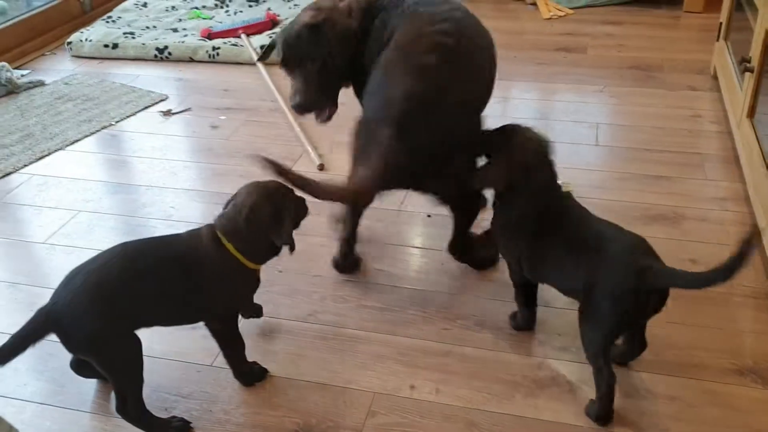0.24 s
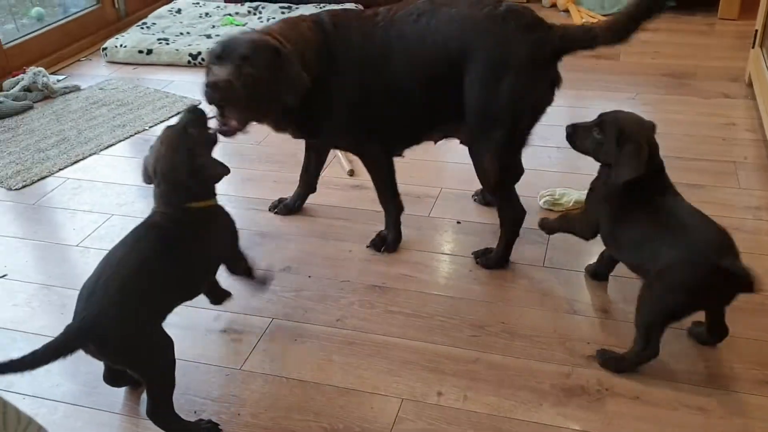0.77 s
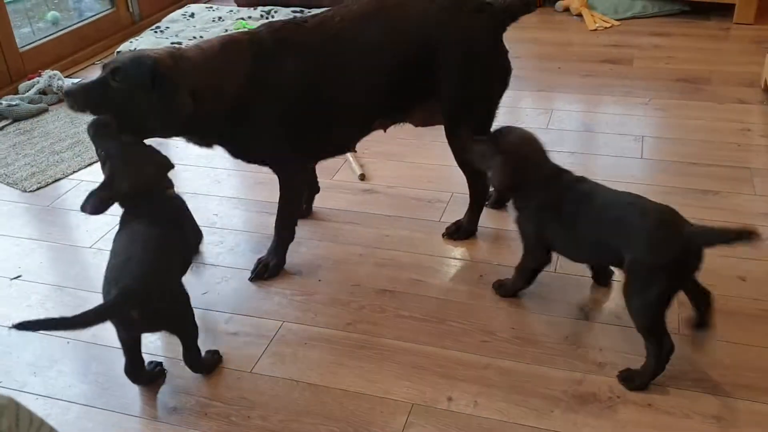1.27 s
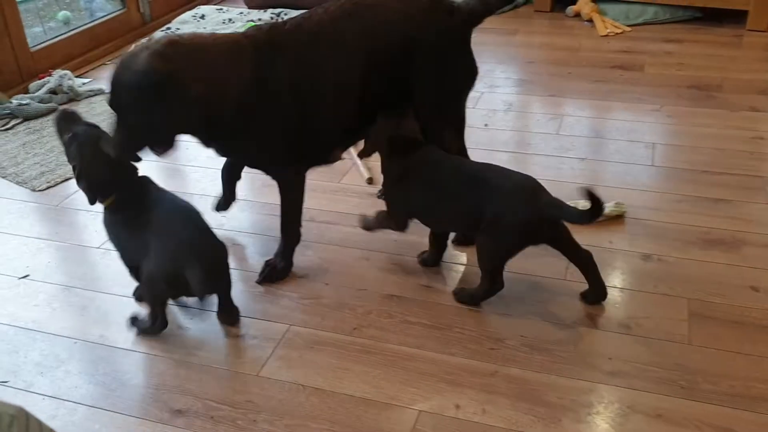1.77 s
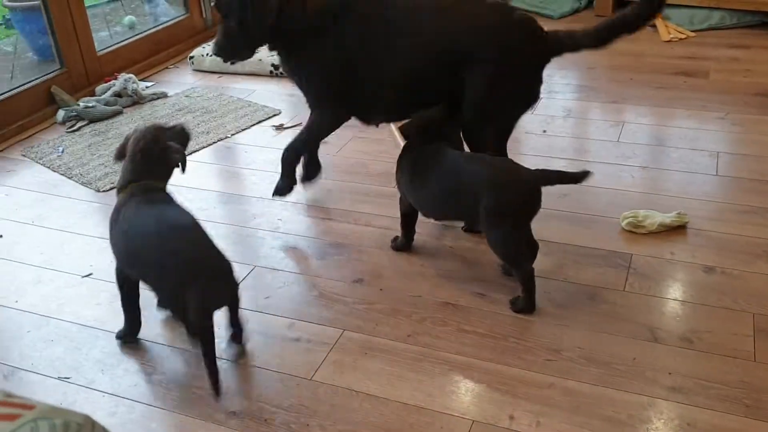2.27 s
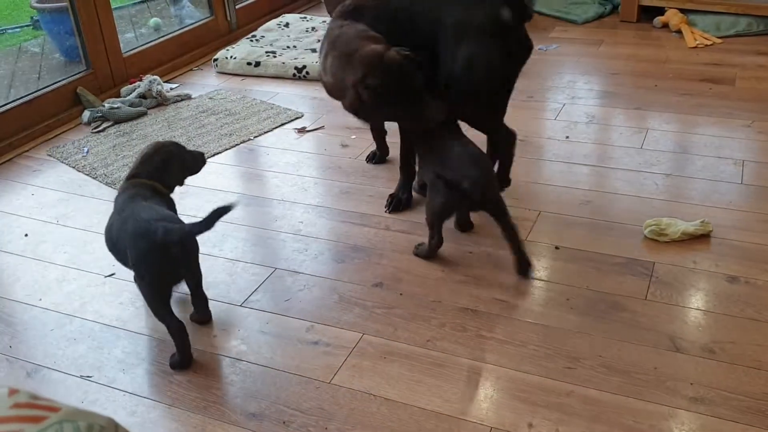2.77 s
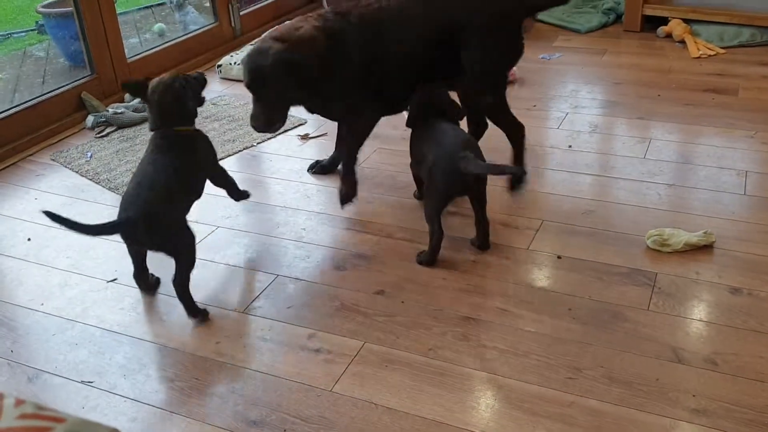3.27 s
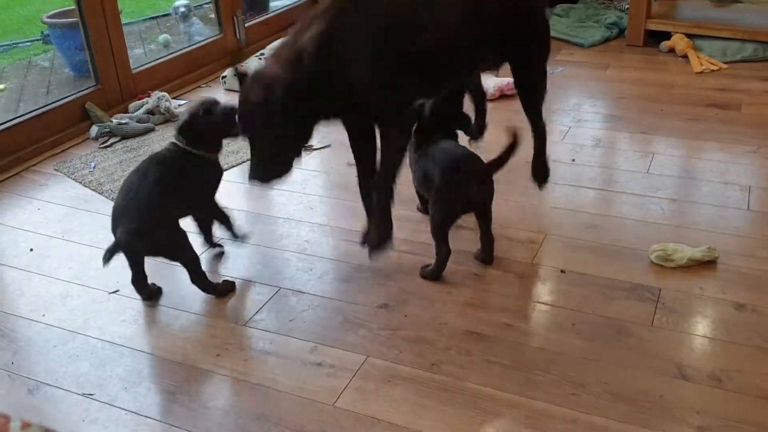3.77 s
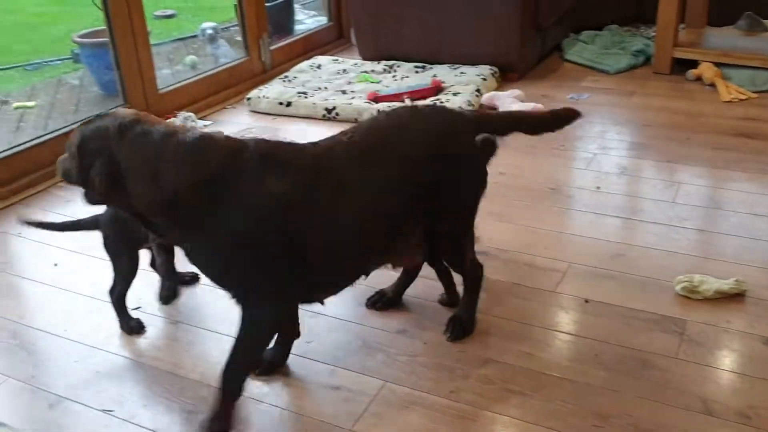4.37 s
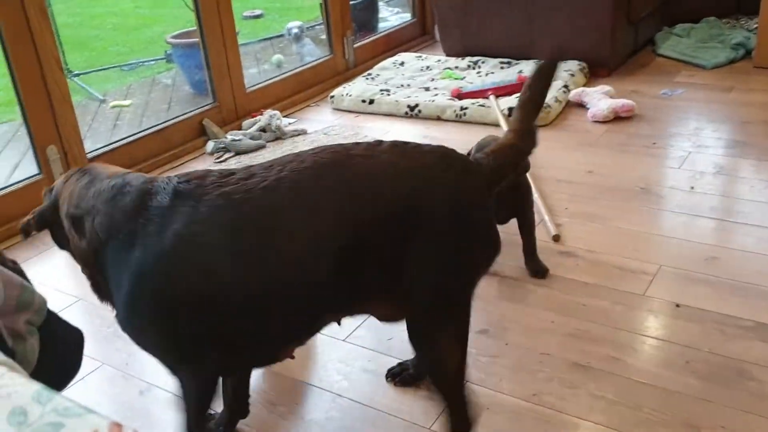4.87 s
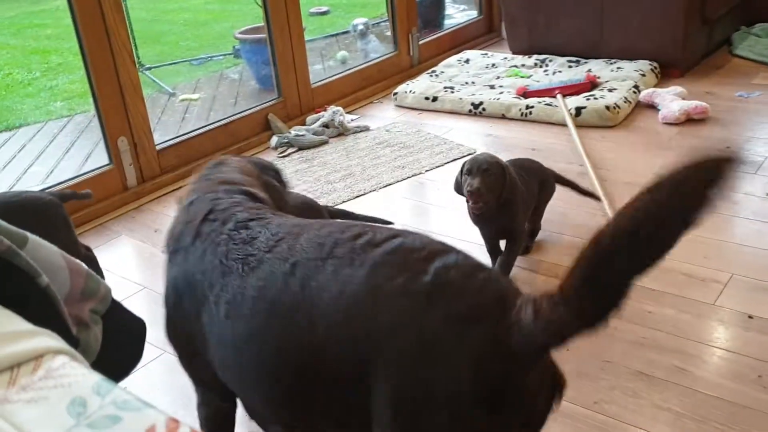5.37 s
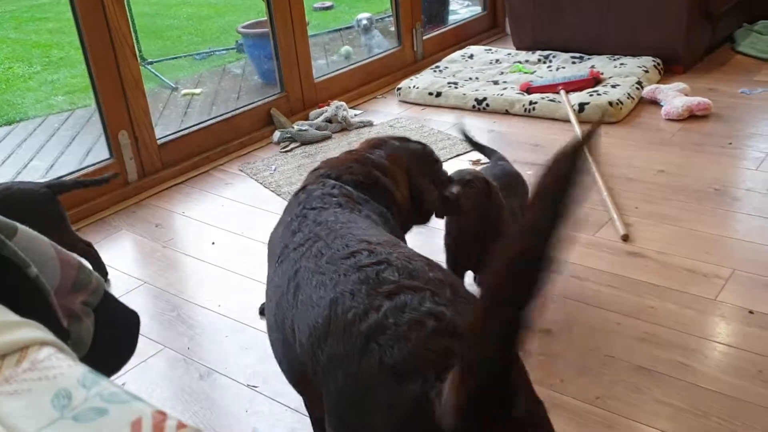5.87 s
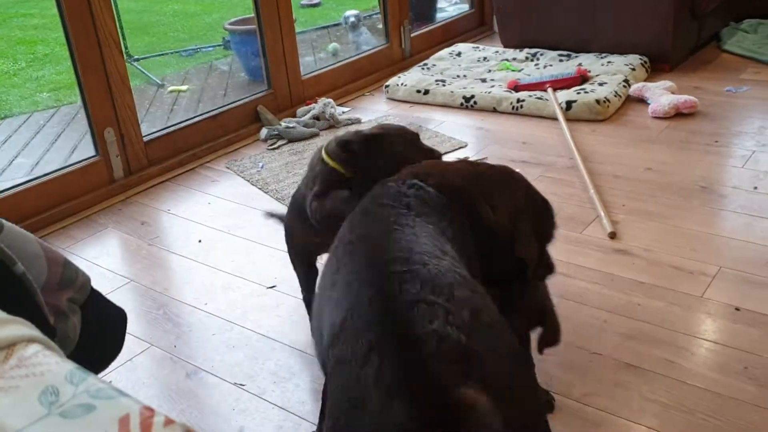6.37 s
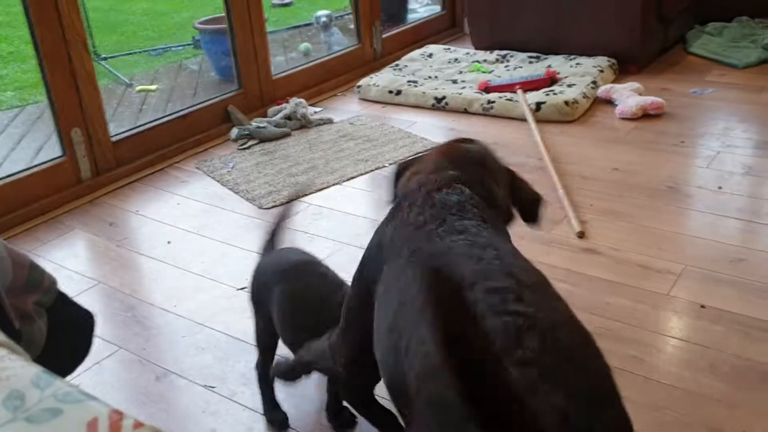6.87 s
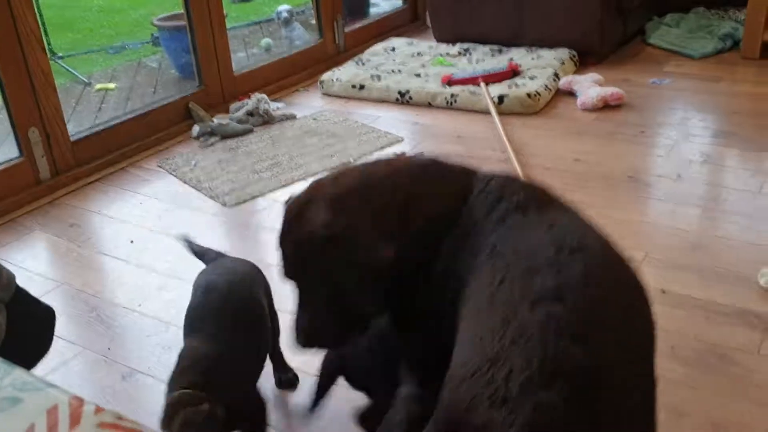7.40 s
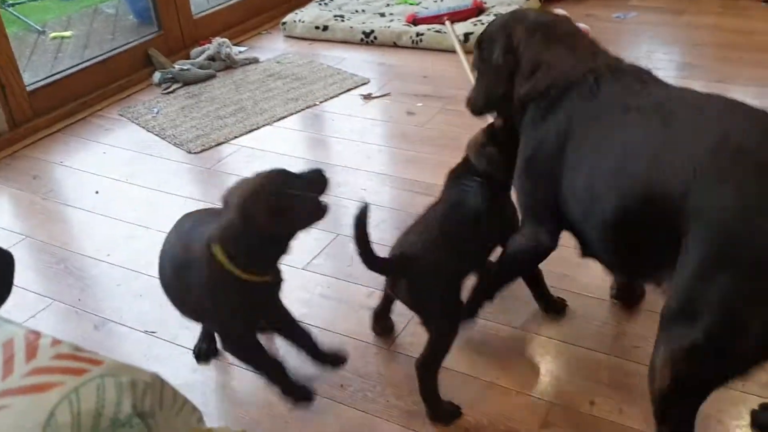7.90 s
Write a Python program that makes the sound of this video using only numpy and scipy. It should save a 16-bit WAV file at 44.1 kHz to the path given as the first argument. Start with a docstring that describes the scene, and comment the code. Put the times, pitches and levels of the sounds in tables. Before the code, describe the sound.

Dog claws click, tick and skid rapidly across an echoing wooden floor, with soft paw thuds, a low appliance hum and late close bumps.

```python
"""An echoing room with a wooden floor: a big dog and two puppies romp close to a hand-held phone.
Claws click as struck resonances and skid as trains of tiny catches; pads thud and scuff as shaped noise.
Late on the big dog bumps and brushes past close by: decaying low tones, rumble and coat noise.
Underneath, an appliance hums as one steady-pitched tone over a bed of soft coloured air."""
import sys
import numpy as np
from scipy import signal
from scipy.fft import rfft, irfft, next_fast_len
from scipy.io import wavfile

SR = 44100
rng = np.random.default_rng(int(sys.argv[2]) if len(sys.argv) > 2 else 0)


def put_to_file(sound):
    """Save the sound as 16-bit audio at rate SR, in the file named by the first command-line argument."""
    columns = np.atleast_2d(sound).T  # one column per channel
    safe = np.clip(columns, -1, 1)
    whole_steps = np.round(safe * 32767)
    wavfile.write(sys.argv[1], SR, whole_steps.astype(np.int16))


N = 358972
T = np.arange(N) / SR  # s


def undb(db):
    """Decibels to gain."""
    return 10 ** (np.asarray(db) / 20)


def unit(x):
    """Scale to an energy of one."""
    return x / np.sqrt(np.sum(x ** 2))


def level(x, db):
    """Scale to an rms level."""
    return x * undb(db) / np.sqrt(np.mean(x ** 2))


def curve(points):
    """Read (t/s, level/dB) points as an automation lane over the whole scene."""
    return np.interp(T, *np.transpose(points))


def along(points, hz):
    """Read (f/Hz, value) points on a logarithmic frequency axis."""
    f, value = np.transpose(points)
    return np.interp(np.log(np.maximum(hz, 1)), np.log(f), value)


def colour(x, points):
    """Minimum-phase EQ with the given (f/Hz, level/dB) spectrum, so that attacks stay sharp."""
    size = 2 * next_fast_len(x.shape[-1], real=True)
    hz = np.fft.rfftfreq(size, 1 / SR)
    cepstrum = irfft(np.log(undb(along(points, hz))))
    # folding the cepstrum onto positive time makes the filter causal
    cepstrum[1:size // 2] *= 2
    cepstrum[size // 2 + 1:] = 0
    response = np.exp(rfft(cepstrum))
    return irfft(rfft(x, size) * response)[..., :x.shape[-1]]


def resonate(x, hz, q):
    """One resonance with a gain of one at its centre."""
    b, a = signal.iirpeak(min(hz, SR / 3), max(q, 1), fs=SR)
    return signal.lfilter(b, a, x)


def add(track, s, sound):
    """Mix a sound into a track at a given time."""
    start = max(int(s * SR), 0)
    part = track[..., start:start + sound.shape[-1]]
    part += sound[..., :part.shape[-1]]


def stereo_noise(size, wide_hz=1250):
    """Diffuse noise at two close microphones: alike in the bass, unrelated in the treble."""
    mid, side = rng.standard_normal((2, size))
    side = signal.lfilter(*signal.butter(1, wide_hz, "high", fs=SR), side)
    return np.array([mid + side, mid - side])


def shiver(x, count=5, width_hz=1300):
    """A board carries each frequency at its own speed: all-passes smear a blow but keep its spectrum."""
    pole = np.exp(-np.pi * width_hz / SR)
    for hz in rng.uniform(2500, 12000, count):
        a = np.array([1, -2 * pole * np.cos(2 * np.pi * hz / SR), pole ** 2])
        x = signal.lfilter(a[::-1], a, x)
    return x


# reverb tone: f/Hz, level/dB
REVERB_COLOUR = [(200, 0.5), (700, 5), (1500, 6.5), (3300, 6.5), (5000, -1.5), (8000, -2.5), (16000, 7)]
# reverberation time in each band: f/Hz, T60/s
REVERB_T60 = [(150, 0.79), (400, 0.27), (1000, 0.59), (2800, 0.57), (7000, 0.52), (14000, 0.34)]


def room(x, build_s=0.0006, merge_s=0.02, left_db=1.22):
    """Hard floor and glass doors: single echoes merge into a dense tail with its own decay in each band."""
    t = T[:SR * 3 // 4]
    density = np.clip((t / merge_s / 2) ** 2, 0.04, 1)
    echo_here = rng.random(len(t)) < density
    spectrum = rfft(stereo_noise(len(t)) * echo_here / np.sqrt(density))
    hz = np.fft.rfftfreq(len(t), 1 / SR)
    centres, t60s = np.transpose(REVERB_T60)
    tail = 0
    for weights, t60 in zip(np.eye(len(centres)), t60s):
        # overlapping bands, each falling 60 dB in its T60
        band = irfft(spectrum * along(np.c_[centres, weights], hz), len(t))
        tail = tail + band * np.exp(-np.log(1000) * t / t60)
    tail = colour(tail * (1 - np.exp(-t / build_s)), REVERB_COLOUR)
    sides = zip(tail, (left_db, -left_db))
    return np.array([signal.fftconvolve(x, unit(ear))[:N] * undb(db) for ear, db in sides])


# appliance hum over time: t/s, level/dB
HUM_LEVEL = [(0, -50), (0.6, -47), (6.05, -46.5), (6.35, -53), (8.14, -53)]
# still air of the house: f/Hz, level/dB
AIR_COLOUR = [(25, -9.5), (45, -8), (61, 6), (80, -5.5), (160, -5), (300, -14.5), (400, -18), (700, -13.5),
              (1500, -24.5), (8000, -25), (16000, -35)]


def background(hum_hz=100.1, air_db=-51.5):
    """An appliance hums at twice the mains rate over the still air of the house."""
    hum = level(np.sin(2 * np.pi * hum_hz * T), 0) * undb(curve(HUM_LEVEL))
    return hum + level(colour(stereo_noise(N), AIR_COLOUR), air_db)


# tone of claw on board, for skids and clicks: f/Hz, level/dB
CLAW_TONE = [(150, -34), (400, -26.5), (600, -11.5), (1200, -14), (1900, -13), (3200, -6), (4400, 0.5),
             (6200, 0), (7900, 2), (8700, -4.5), (12500, -1.5), (16000, -16.5)]
# claws skidding: t/s at the peak, relative level/dB, length/s from the peak down to 1/e
CLAW_SKIDS = [(0.01, -36.5, 0.07), (0.618, -31.5, 0.011), (1.37, -49, 0.039), (1.89, -46, 0.028),
              (2.207, -41.5, 0.033), (2.687, -34, 0.027), (2.966, -38, 0.071), (4.579, -34.5, 0.018),
              (4.868, -42, 0.043), (5.6, -40.5, 0.064), (6.693, -39, 0.028), (7.412, -39, 0.078)]


def skids(catches_per_s=450, spread_db=4, direct_db=-4, room_db=-2, left_db=2):
    """A sliding claw catches and lets go hundreds of times a second."""
    pressure = sum(undb(db) * np.exp(-((T - s) / length) ** 2) for s, db, length in CLAW_SKIDS)
    caught = rng.random(N) < catches_per_s / SR
    catches = caught * undb(spread_db * np.clip(rng.standard_normal(N), -2, 2))
    scrape = level(colour(resonate(catches, 3580, 1), CLAW_TONE), 0) * pressure
    direct = np.array([shiver(scrape) * undb(db) for db in (left_db, -left_db)])
    return undb(direct_db) * direct + undb(room_db) * room(scrape)


# paws landing, shared by pads, claws and scuffs: t/s, energy level of the first claw/dB, ring f/Hz,
# room share/dB, time from claw to claw/s (0 = one claw only)
PAW_STEPS = [(0.0882, -12, 5630, 7.5, 0.00099), (0.2781, 6, 6100, 4.5, 0.016),
             (0.525, -10.5, 7080, 5, .019), (0.5644, -13, 6160, 9, 0.00012), (0.7087, -6, 5270, 7.5, 0),
             (0.8363, -12, 5920, 3.5, 0.00026), (0.926, -16, 4900, 7, 0),
             (1.0353, -19.5, 5750, 1, 0.000032), (1.1574, -3.5, 7240, 3.5, .0057),
             (1.548, -20, 5070, 4, 0.000038), (1.6196, -17.5, 5700, 5.5, 0.00072),
             (1.7046, -9.5, 5660, 2.5, 0), (1.9361, -2, 4800, 9.5, .0045), (1.983, -6, 5600, 0, 0.0004),
             (2.0721, -5, 5300, 8.5, 0.008), (2.3028, -12, 7050, 2, 0.00044), (2.3662, 0.5, 4800, 5, .0054),
             (2.3883, -4, 5670, 4, 0.00035), (2.4873, 8, 4900, 3.5, .0082),
             (2.8269, -7.5, 5040, 12, 0.0014), (3.0421, 6.5, 4570, 2.5, .0056),
             (3.3133, 0.5, 5160, 11.5, .003), (3.5523, -13.5, 5230, 3, 0.00079),
             (3.7344, -17.5, 6460, 16.5, 0), (3.802, -12, 7250, 1, 0), (3.8395, 0.5, 4800, 1.5, .0094),
             (3.8837, 7.5, 6840, 0.5, .012), (4.2243, 3, 7700, 1.5, .011),
             (4.2949, -2.5, 6800, 3.5, 0.00015), (4.3101, -2.5, 6840, 6, 0), (4.3603, -2.5, 7700, -5, 0),
             (4.4827, -12, 7400, 4, 0.00038), (4.6591, -11.5, 6900, 4, 0), (4.6762, 0, 7400, -0.5, .0044),
             (4.7659, -3.5, 7360, 8.5, 0), (4.9785, -4.5, 7650, 0.5, 0.000091), (5.0463, 4, 7200, 5, .0066),
             (5.3294, -8.5, 7300, 3, 0.00035), (5.399, -4.5, 7150, 9, .003), (5.432, -7, 7200, 4, 0),
             (5.668, -2.5, 7100, 3, .0068), (5.7553, -8.5, 7100, 10, 0.022), (6.1763, 2, 5360, 6, .004),
             (6.1915, -2.5, 7150, 1, 0.00016), (6.7425, -8, 7140, 3.5, 0), (6.7738, -6, 8300, -8, 0),
             (7.0505, 6, 7300, 3.5, .007), (7.0786, -.5, 6600, 2.5, 0.00065),
             (7.1914, -9.5, 6800, 7.5, 0.00077), (7.4342, -9.5, 6960, 9, 0.00051),
             (7.5529, 3.5, 7600, 7.5, .0128), (7.5828, 0.5, 7550, 3.5, 0.0022),
             (7.8106, 2.5, 7040, 5.5, 0.03), (8.086, -11.5, 4540, 2, 0)]
# thud of a pad on the floor: f/Hz, level/dB
PAD_TONE = [(25, -13), (60, 10.5), (110, 0.5), (170, 2), (300, -8), (600, -7), (1500, -27.5), (5000, -57)]
# heavy landings that thump the floor: t/s, energy level/dB
HEAVY_THUDS = [(1.15, -15), (2.31, -15.5), (2.78, -11), (3.068, -12.5), (3.869, -13.5), (3.987, -15),
               (4.21, -10), (4.289, -10), (4.966, -14.5), (5.648, -15), (5.769, -15.5), (6.047, -12.5)]


def pads(push_s=0.02, lead_s=0.013, step_db=-21, force_slope=0.64, room_db=-4):
    """Soft pads push the hollow floor: a short low thud, faint at each step, clear at a heavy landing."""
    out, t = np.zeros(N), T[:SR // 7]
    # a pad lands just before its claws; force_slope is thud dB per claw dB
    landings = [(s - lead_s, step_db + force_slope * db) for s, db, *_ in PAW_STEPS]
    for s, db in HEAVY_THUDS + landings:
        push = rng.standard_normal(len(t)) * t * np.exp(-t / push_s)
        add(out, s, unit(colour(push, PAD_TONE)) * undb(db))
    return out + undb(room_db) * room(out)


def click(ring_hz, ring_q=6, edge_ratio=1.45, board_q=24, count=7):
    """One sharp blow rings the claw and a few board modes, different ones at each spot."""
    blow = signal.unit_impulse(1024)
    # a stiff claw rings higher and also makes a shorter, brighter contact
    edge_hz = min(edge_ratio * ring_hz, 0.45 * SR)
    blow = signal.lfilter(*signal.butter(1, edge_hz, fs=SR), blow)
    modes_hz = rng.uniform(1200, 8500, count)
    board = sum(rng.choice([-1, 1]) * resonate(blow, hz, board_q) for hz in modes_hz)
    return unit(colour(blow + resonate(blow, ring_hz, ring_q) + board, CLAW_TONE))


def near_floor(sound, touch_db=-6, touch_s=0.0011, scatter_db=-11, scatter_s=0.0075):
    """The claw touches, then bites; nearby legs and boards scatter the sound towards both microphones."""
    t, toe = T[:len(sound)], undb(touch_db) * shiver(sound)
    add(toe, touch_s * (0.5 + rng.random()), shiver(sound))
    scatter = rng.standard_normal((2, len(t))) * np.exp(-t / scatter_s)
    ears = []
    for ear in scatter:
        straight = shiver(unit(toe), count=3)
        scattered = unit(signal.fftconvolve(sound, ear)[:len(t)])
        ears.append(unit(straight + undb(scatter_db) * scattered))
    return np.array(ears)


def claw_hits(next_claw_db=-3.5, next_room_db=-1):
    """A paw lands on one claw, or rolls on to a second, lighter one: t/s, level/dB, ring f/Hz, room/dB."""
    hits = []
    for s, db, hz, share_db, roll_s in PAW_STEPS:
        for toe in range(2 if roll_s > 0 else 1):
            hits.append((s + toe * roll_s, db + toe * next_claw_db, hz, share_db + toe * next_room_db))
    return hits


def light_ticks(tick_db=-10, spread_db=4.5, force_slope=0.94, within_s=0.05, room_db=0):
    """A loose claw ticks faintly as a paw settles or lifts: t/s, level/dB, ring f/Hz, room/dB."""
    ticks = []
    for (s, db, hz, *_), (when, force, ring) in zip(PAW_STEPS, rng.random((len(PAW_STEPS), 3))):
        tick_level = tick_db + force_slope * db + spread_db * (2 * force - 1)
        ring_hz = hz * 2 ** ((ring - 0.5) / 2)  # up to a quarter octave either way
        ticks.append((s + within_s * when, tick_level, ring_hz, room_db))
    return ticks


# lean of the clicks as the dogs move round: t/s, left minus right level/dB
CLICK_LEAN = [(0, 9), (1.5, 10), (4.6, 7.5), (5.1, 5), (5.7, 8), (6.2, 1), (7.0, 12), (7.8, 8)]


def claws(lead_s=0.00062, lean_spread_db=3, count=4):
    """Clicks reach us straight from the floor, then from the walls, taking turns among a few echoes."""
    direct, spots = np.zeros((2, N)), np.zeros((count, N))
    for step, (s, db, ring_hz, share_db) in enumerate(claw_hits() + light_ticks()):
        sound = click(ring_hz) * undb(db)
        pan_db = np.interp(s, *np.transpose(CLICK_LEAN)) + lean_spread_db * rng.standard_normal()
        sides = np.sqrt(2) * unit(undb([[pan_db], [0]]))
        add(direct, s - lead_s, near_floor(unit(sound)) * undb(db) * sides)
        add(spots[step % count], s, sound * undb(share_db))
    return direct + sum(room(spot) for spot in spots)


# rub of a pad on the boards: f/Hz, level/dB
SCUFF_TONE = [(300, -9.5), (650, 0.5), (1300, -5), (2500, -11.5)]
# paws shoving off over the boards: t/s, relative level/dB, board resonance f/Hz
SHOVES = [(0.579, -44, 820), (1.284, -49, 830), (1.705, -43, 1230), (1.892, -42, 1110),
          (1.935, -38.5, 1160), (2.311, -40, 623), (2.788, -44.5, 538), (2.866, -40, 1090),
          (3.042, -36.5, 1170), (3.164, -40, 540), (3.314, -37, 716), (3.944, -32.5, 530),
          (3.979, -37.5, 674), (4.534, -43.5, 793), (4.764, -43, 780), (4.945, -44.5, 940),
          (6.06, -52.5, 980), (7.74, -36.5, 540), (7.835, -37, 700), (7.928, -42.5, 820)]


def scuffs(slap_s=0.014, drag_s=0.047, drag_db=-6, board_q=6.4, upper_ratio=1.424, upper_db=-4,
           direct_db=24, room_db=26, step_db=-46, force_slope=0.56, board_hz=810, spread_octaves=0.25):
    """A pad slaps and drags on, rubbing two board resonances: lightly at each step, harder at a shove."""
    out, t = np.zeros(N), T[:SR // 6]
    pressure = np.exp(-t / slap_s) + undb(drag_db) * np.exp(-t / drag_s)
    landings = []
    for s, db, *_ in PAW_STEPS:
        spot_hz = board_hz * 2 ** (spread_octaves * rng.standard_normal())
        landings.append((s, step_db + force_slope * db, spot_hz))
    for s, db, spot_hz in SHOVES + landings:
        rub = rng.standard_normal(len(t)) * pressure
        lower = resonate(rub, spot_hz, board_q)
        upper = resonate(rub, spot_hz * upper_ratio, board_q)
        add(out, s, unit(colour(lower + undb(upper_db) * upper, SCUFF_TONE)) * undb(db))
    return undb(direct_db) * out + undb(room_db) * room(out)


def drag(s, hold_s, lead_s=0.025, attack_s=0.02, release_s=0.064):
    """Flank on furniture: the coat touches just before the knock, then pressure builds, holds and eases."""
    attack = np.clip((T - s + lead_s) / attack_s, 0, 1)
    return attack * np.exp(-np.maximum(T - s - hold_s, 0) / release_s)


# slap and rumble of a bump: f/Hz, level/dB
BUMP_TONE = [(25, -17), (65, 13), (110, -2), (170, 0), (280, -3.5), (450, -8), (800, -18.5), (2000, -50)]
# coat rubbing along: f/Hz, level/dB
RUB_TONE = [(150, -4), (400, -5), (700, 4), (1100, -2.5), (2000, -7.5), (5000, -7.5), (15000, -19)]
# the big dog on furniture: t/s, relative knock level/dB, knock f/Hz, relative rumble level/dB,
# relative coat level/dB, drag/s
BIG_DOG_CONTACTS = [(6.412, -30, 135, -41, -78.5, 0.079), (6.566, -34, 162, -42.5, -46, 0.024),
                    (6.735, -30.5, 98, -36.5, -43, .12), (7.12, -44, 89, -39.5, -49, 0.08),
                    (7.249, -32, 90.5, -35.5, -45.5, 0.12), (7.4, -42, 70, -46, -38, .12),
                    (7.665, -32, 245, -53, -52, .02), (7.735, -34, 555, -42.5, -34.5, 0.038),
                    (7.835, -33, 96, -48, -42.5, 0.22)]


def brushing(rumble_db=-3.5, rub_db=-5, knock_db=21, knock_s=0.022, body_db=-2, room_db=-8):
    """The big dog knocks against soft furniture and drags its coat along it."""
    knocks, weight, friction = np.zeros((3, N))
    t = T[:SR // 5]
    fade = np.exp(-t / knock_s)
    for s, db, hz, low_db, coat_db, drag_s in BIG_DOG_CONTACTS:
        body = unit(np.sin(2 * np.pi * hz * t) * fade * (1 - fade))
        slap = unit(colour(rng.standard_normal(len(t)) * fade, BUMP_TONE))
        add(knocks, s, (undb(body_db) * body + slap) * undb(db + knock_db))
        pressure = drag(s, drag_s)
        weight = np.maximum(weight, pressure * undb(low_db))
        friction = np.maximum(friction, pressure * undb(coat_db))
    rumble = level(colour(stereo_noise(N), BUMP_TONE), rumble_db) * weight
    rub = level(colour(stereo_noise(N), RUB_TONE), rub_db) * friction
    return rumble + rub + knocks + undb(room_db) * room(knocks)


def scene(left_db=0.7):
    """Claws on top; the softer sounds lean slightly to the left."""
    soft = background() + pads() + scuffs() + brushing()
    return skids() + claws() + soft * undb([[left_db], [-left_db]])


def record(dry, top_hz=16000):
    """The phone clips at full scale and cuts the top."""
    low_pass = signal.ellip(8, 0.2, 70, top_hz, fs=SR, output="sos")
    return signal.sosfilt(low_pass, np.clip(dry, -1, 1))


dry = scene()
out = record(dry)
put_to_file(out)
```